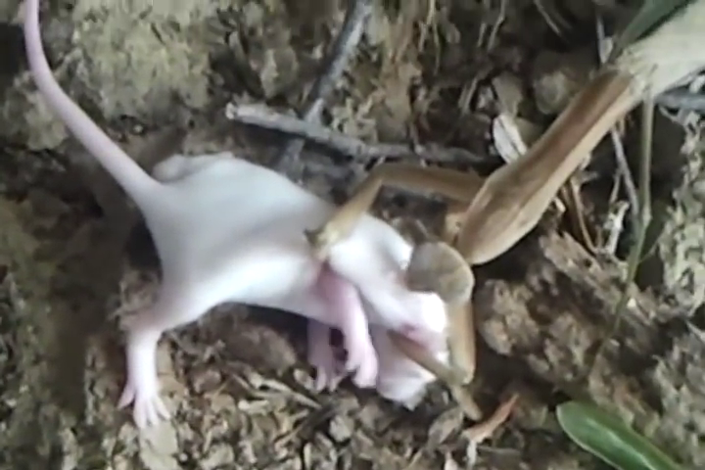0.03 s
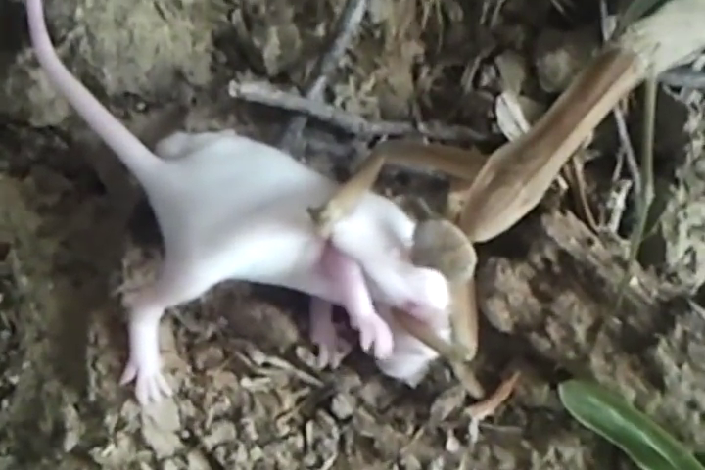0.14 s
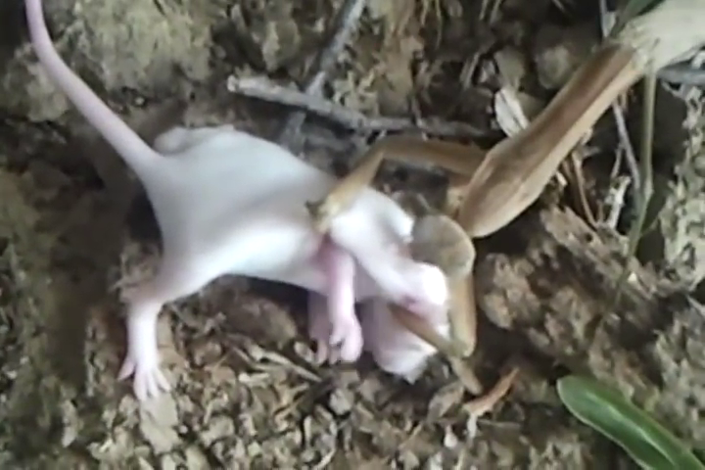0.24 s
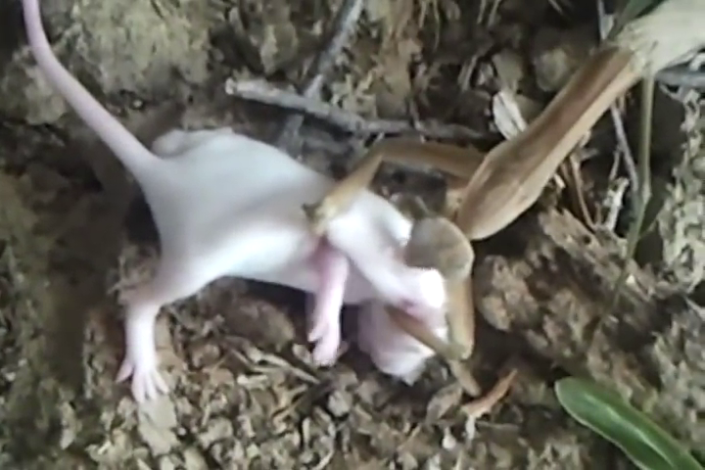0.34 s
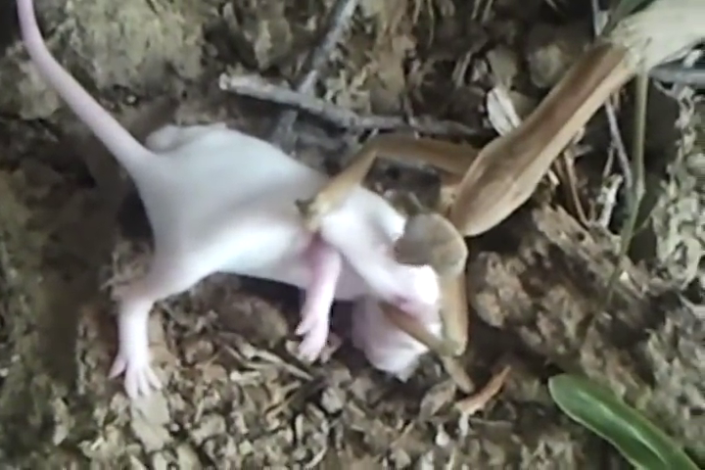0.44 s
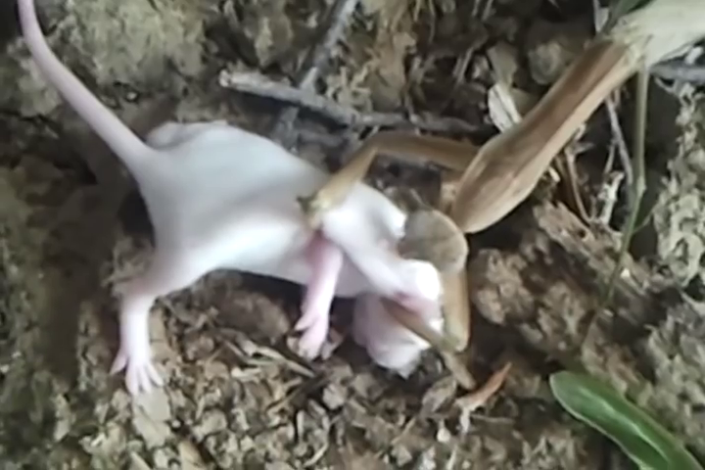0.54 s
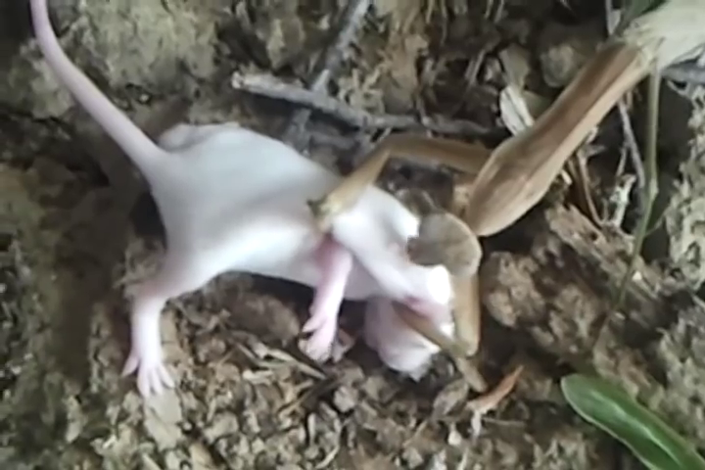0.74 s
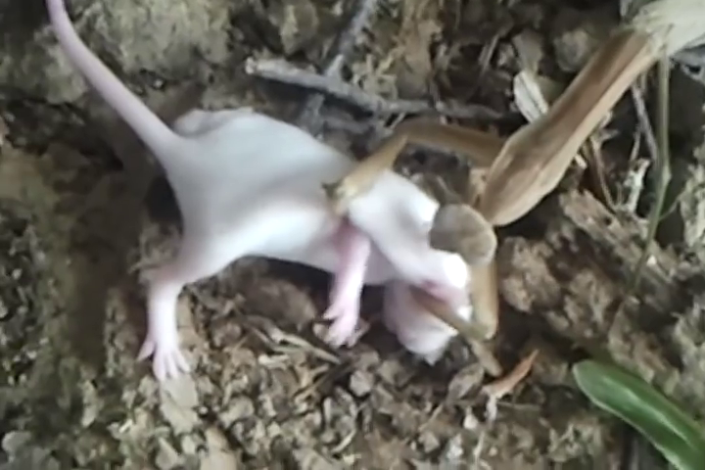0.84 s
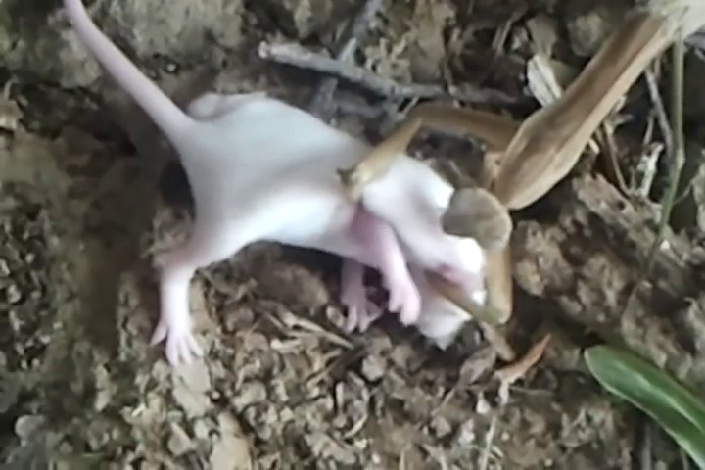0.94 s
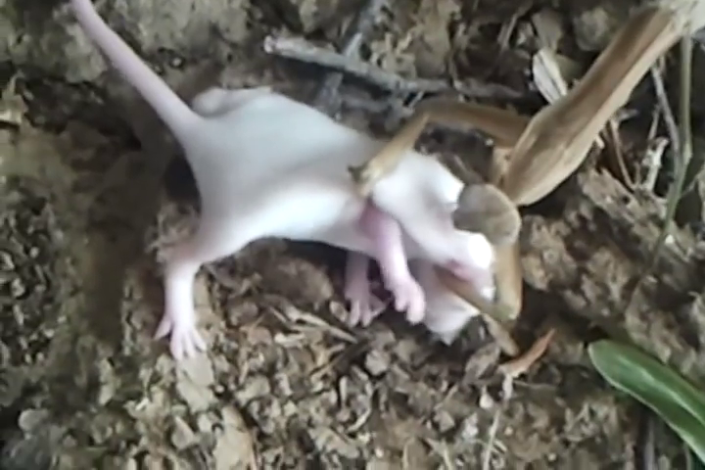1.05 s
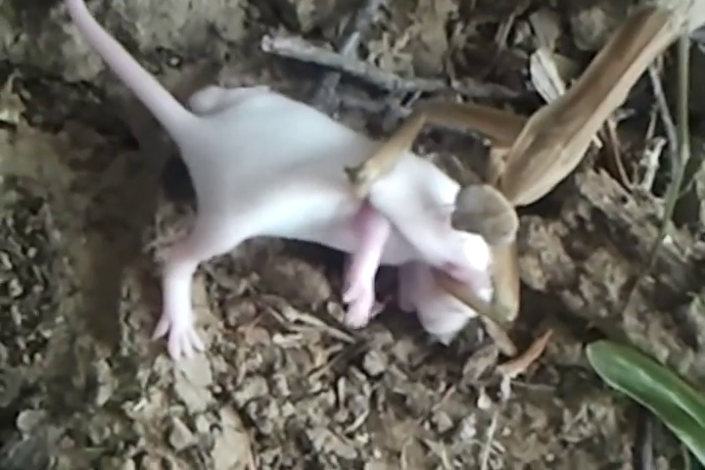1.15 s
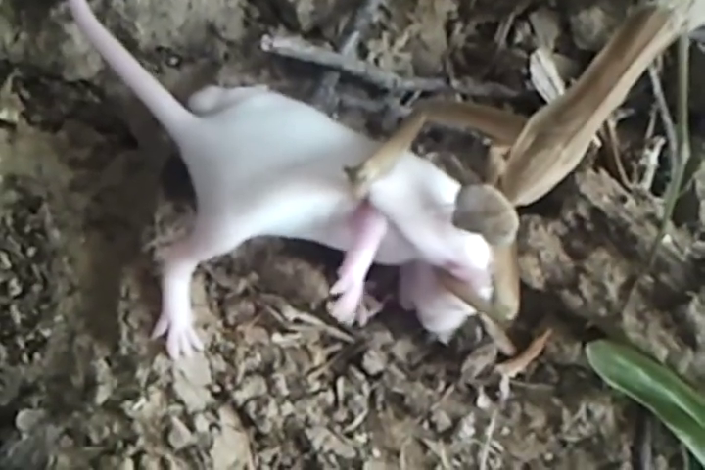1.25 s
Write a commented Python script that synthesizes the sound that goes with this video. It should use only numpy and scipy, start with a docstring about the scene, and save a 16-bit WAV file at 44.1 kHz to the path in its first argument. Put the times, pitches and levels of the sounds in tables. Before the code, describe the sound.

Close, dry clicks open with soft taps and a gritty crackle, then two quick brittle snaps, probably a mantis biting or moving on soil. Faint ticks follow later, over a distant outdoor hiss and low hum.

```python
"""Small dry clicks, probably bites or shifting grit, as a mantis holds a baby mouse on dry soil.
Close to the microphone come two dull taps, a faint crackle, two sharp snaps and, later, faint ticks.
Each snap pushes on its support, splinters and rings briefly; the ground throws back a short tail.
Farther off lie a faint outdoor hiss, a fainter whir and a low, wavering hum."""
import sys
import numpy as np
from scipy import signal
from scipy.fft import rfft, irfft, next_fast_len
from scipy.io import wavfile

SR = 44100
rng = np.random.default_rng(int(sys.argv[2]) if len(sys.argv) > 2 else 0)


def output_pcm(signal):
    """Save a mono or channel-first signal as 16-bit PCM at the path in sys.argv[1].

    Samples are clipped to [-1, 1] before scaling.
    """
    pcm = np.clip(np.atleast_2d(signal).T, -1, 1) * 32767
    wavfile.write(sys.argv[1], SR, np.round(pcm).astype(np.int16))


N = 57330

# Distant outdoor hiss: (frequency [Hz], relative density [dB])
HISS_SPECTRUM = [(25, -23), (65, -7.5), (110, -5.5), (170, -3.5), (330, -5.5), (600, -6), (900, -8),
                 (2100, -13), (4500, -16), (7100, -14.5), (8200, -18.5), (9400, -32)]
# Narrow whir within the hiss: (frequency [Hz], relative density [dB])
WHIR_SPECTRUM = [(520, -30), (620, -7), (660, 2.5), (700, -10.5), (850, -47)]
# Low hum: (frequency [Hz], relative density [dB])
HUM_SPECTRUM = [(90, -42.5), (135, -10), (162, -4), (195, -6.5), (280, -43.5)]
# Rise and fall of the hum: (time [s], level [dB])
HUM_LEVELS = [(0, -74), (.18, -66), (.34, -63), (.38, -61), (.435, -59), (.465, -72.5), (.95, -69.5),
              (1.03, -66), (1.3, -66)]
# Slips of grit near the microphone: (time [s], level [dB])
GRIT_SLIPS = [(0.0570, -48), (0.1733, -44.5), (0.183, -53), (0.1930, -45), (0.2006, -47), (0.2070, -44),
              (0.2105, -37.5), (0.2428, -51)]
# Grit and splinters: (frequency [Hz], relative density [dB])
GRIT_SPECTRUM = [(300, -32.5), (1200, -16), (2000, -13.5), (3000, -9), (5200, -1), (6800, -2), (8000, -5.5),
                 (9200, -19)]
# Brittle snaps, the faintest mere ticks: (time [s], level [dB], pitch [ratio], tilt [dB/octave],
# relative splinter level [dB], relative thud level [dB], thud centre [Hz])
BRITTLE_SNAPS = [(0.0588, -33, .92, -2, -18, -11, 1400), (0.2128, -7.5, 0.956, 1.5, -17.5, -12, 1170),
                 (0.2307, -6.5, 1.026, 0, -19.5, -16.5, 668), (1.1131, -36.5, 1.2, -4, -6.5, -7, 2000),
                 (1.115, -39.5, 1.04, -1, -10, -3, 2000), (1.1250, -41, 0.78, 3, -4.5, -16, 2000)]
# Modes of a brittle piece: (base frequency [Hz], relative level [dB], 60 dB decay time [s])
BRITTLE_MODES = [(1960, -25.5, 0.0021), (3048, -10.5, 0.008), (4490, -25, 0.0027), (6030, -1.5, 0.0027),
                 (6540, 3, .003), (7260, -13, 0.0028)]
# Sound thrown back by soil and litter: (frequency [Hz], relative density [dB])
GROUND_SPECTRUM = [(200, -20.5), (700, -11), (1300, -14), (2000, -8.5), (3500, -7), (4800, -5), (6000, 0.5),
                   (7500, -2.5), (9000, -8)]
# Dull taps: (time [s], level [dB], relative edge level [dB])
DULL_TAPS = [(0.0800, -28.5, -11), (0.1624, -26.5, -3.5)]
# Treble roll-off at the microphone: (frequency [Hz], gain [dB])
MIC_RESPONSE = [(7600, 0), (8200, -4.5), (8700, -13), (9300, -35)]

ATTACK_S = 0.00018
BAND_LIMIT_HZ = 9430


def amp(db):
    """Decibels to gain."""
    return 10 ** (np.asarray(db) / 20)


def clock():
    """The time of each sample in seconds."""
    return np.arange(N) / SR


def gain_at(curve, hz):
    """Gain along a (frequency [Hz], level [dB]) curve, on a log frequency axis."""
    curve_hz, curve_db = np.transpose(curve)
    return amp(np.interp(np.log(hz + 1), np.log(curve_hz + 1), curve_db))


def filtered(x, response):
    """Pass x through a frequency response that ends at the band limit."""
    size = next_fast_len(N + SR // 2)
    hz = np.fft.rfftfreq(size, 1 / SR)
    return irfft(rfft(x, size) * response(hz) * (hz < BAND_LIMIT_HZ), size)[:N]


def noise(spectrum):
    """Coloured noise of rms 1."""
    x = filtered(rng.standard_normal(N), lambda hz: gain_at(spectrum, hz))
    return x / x.std()


def fade(t, t60):
    """A decay of 60 dB in t60 seconds."""
    return np.exp(-np.log(1000) * t / t60)


def burst(at, rise_s, fall_s):
    """An envelope that swells 60 dB in rise_s, peaks at the given time and drops 60 dB in fall_s."""
    t = clock() - at
    return fade(np.maximum(-t, 0), rise_s) * fade(np.maximum(t, 0), fall_s)


def background(hiss_db=-58, whir_db=-72.5):
    """Farther off: steady hiss and whir, and a low hum that swells, drops and creeps back."""
    hum_db = np.interp(clock(), *np.transpose(HUM_LEVELS))
    hiss = amp(hiss_db) * noise(HISS_SPECTRUM)
    whir = amp(whir_db) * noise(WHIR_SPECTRUM)
    return hiss + whir + amp(hum_db) * noise(HUM_SPECTRUM)


def crackle():
    """Grit slips in tiny bursts close to the microphone."""
    envelope = sum(amp(db) * burst(at, rise_s=0.0014, fall_s=0.018) for at, db in GRIT_SLIPS)
    return envelope * noise(GRIT_SPECTRUM)


def thud(at, centre_hz, width_ratio=0.89, low_cut_hz=200):
    """A light push on the support, about one cycle long, with no bass."""
    def response(hz):
        damping = 1j * hz * centre_hz * width_ratio
        low_cut = (1j * hz / (low_cut_hz + 1j * hz)) ** 2
        return low_cut * damping / (centre_hz ** 2 - hz ** 2 + damping)
    push = filtered(signal.unit_impulse(N, round(at * SR)), response)
    return -push / np.abs(push).max()


def ring(at, pitch, tilt_db):
    """A small brittle piece rings in heavily damped modes; the tilt pivots on the strongest."""
    t = np.maximum(clock() - at, 0)
    main_hz = max(BRITTLE_MODES, key=lambda mode: mode[1])[0]
    modes = np.zeros(N)
    for hz, db, t60 in BRITTLE_MODES:
        gain = amp(db + tilt_db * np.log2(hz / main_hz))
        modes += gain * fade(t, t60) * np.sin(2 * np.pi * hz * pitch * t)
    attack = 1 - np.exp(-(t / ATTACK_S) ** 2)
    return attack * modes


def ground_scatter(at):
    """The ground and nearby litter throw back a short diffuse tail."""
    early = amp(-21) * burst(at, ATTACK_S, fall_s=0.016)
    late = amp(-33.5) * burst(at, ATTACK_S, fall_s=0.072)
    return (early + late) * noise(GROUND_SPECTRUM)


def snaps(thud_lead_s=0.0004):
    """Close up, the support gives just before each piece snaps, splintering and ringing briefly."""
    out = np.zeros(N)
    for at, db, pitch, tilt_db, splinter_db, thud_db, thud_hz in BRITTLE_SNAPS:
        splinters = amp(splinter_db) * noise(GRIT_SPECTRUM) * burst(at, rise_s=0.0059, fall_s=0.012)
        push = amp(thud_db) * thud(at - thud_lead_s, thud_hz)
        out += amp(db) * (push + splinters + ring(at, pitch, tilt_db) + ground_scatter(at))
    return out


def taps():
    """Softer contacts at the same spot: mostly thud, with a slight bright edge."""
    out = np.zeros(N)
    for at, db, edge_db in DULL_TAPS:
        edge = amp(edge_db) * ring(at, pitch=1.185, tilt_db=0)
        out += amp(db) * (thud(at, centre_hz=885) + edge + ground_scatter(at))
    return out


def scene():
    """Outdoors on dry soil, with one microphone close to the mantis."""
    return (snaps() + taps() + crackle() + background())[None]


def record(dry):
    """The microphone rolls off the top of the treble; nothing passes above the band limit."""
    return np.array([filtered(channel, lambda hz: gain_at(MIC_RESPONSE, hz)) for channel in dry])


dry = scene()
out = record(dry)
output_pcm(out)
```